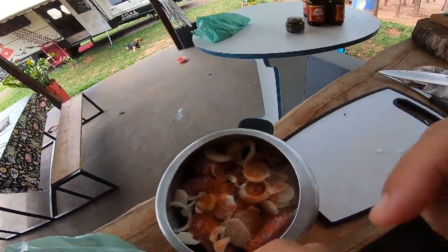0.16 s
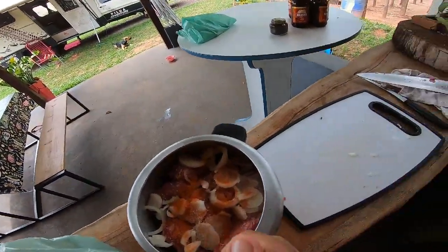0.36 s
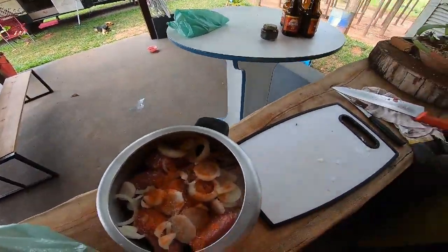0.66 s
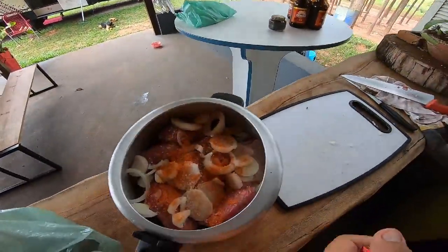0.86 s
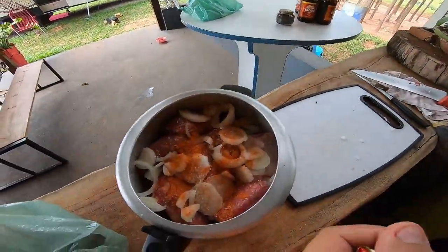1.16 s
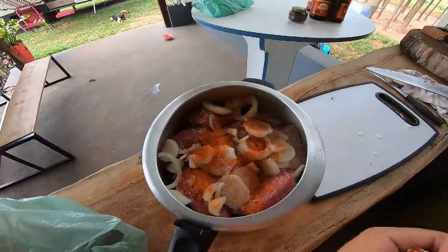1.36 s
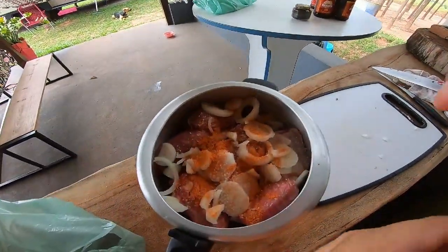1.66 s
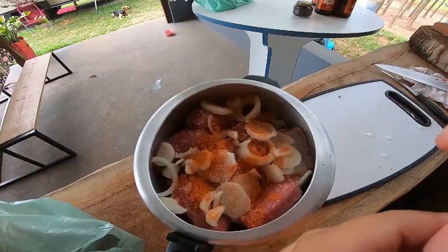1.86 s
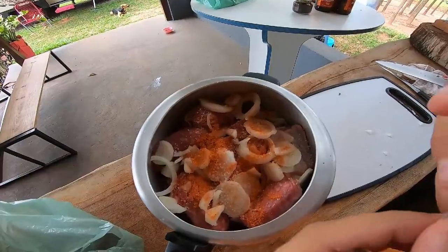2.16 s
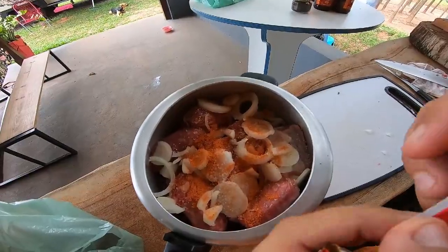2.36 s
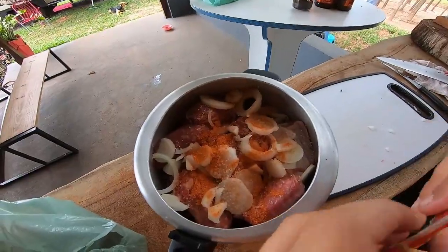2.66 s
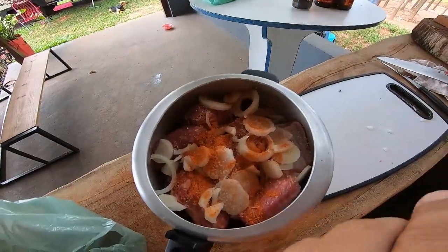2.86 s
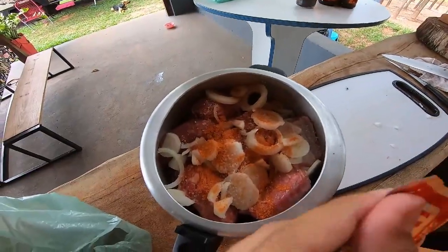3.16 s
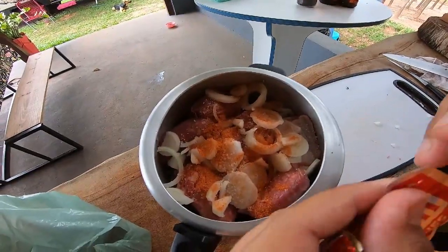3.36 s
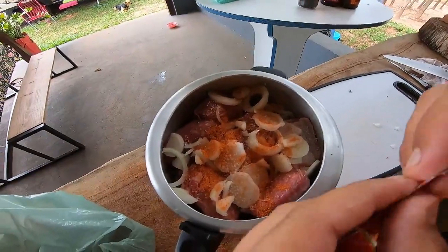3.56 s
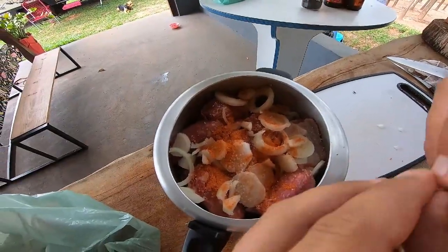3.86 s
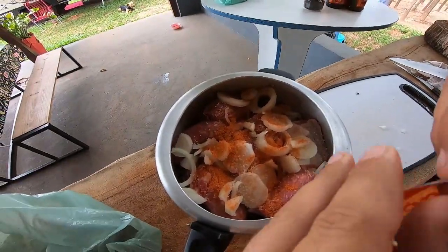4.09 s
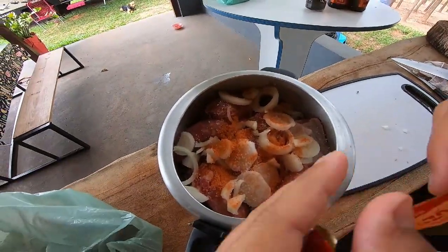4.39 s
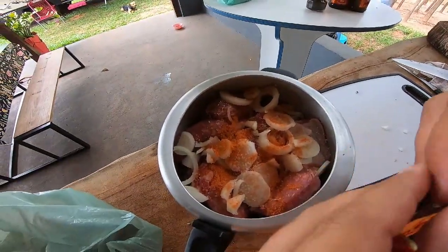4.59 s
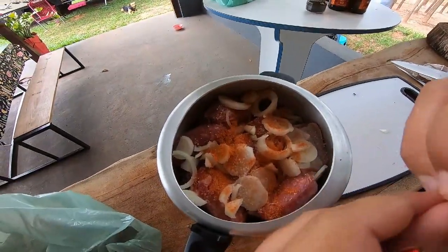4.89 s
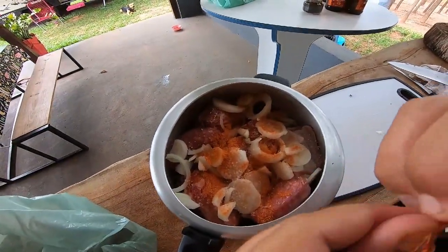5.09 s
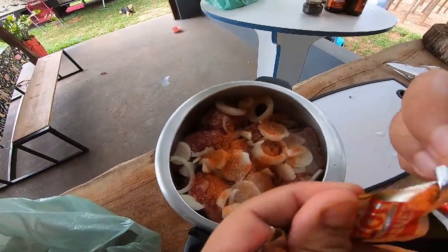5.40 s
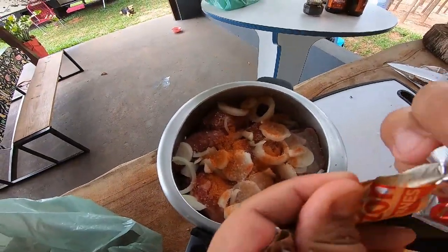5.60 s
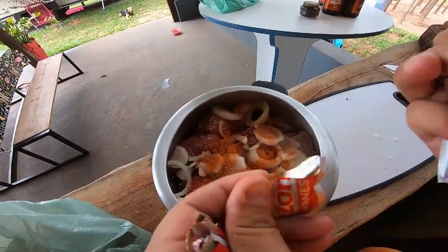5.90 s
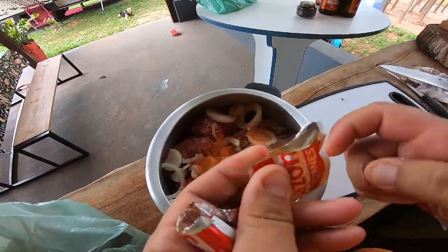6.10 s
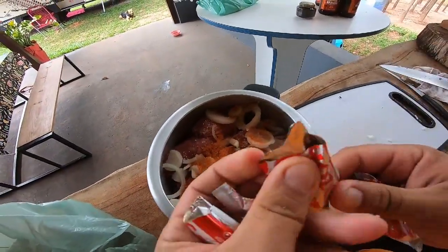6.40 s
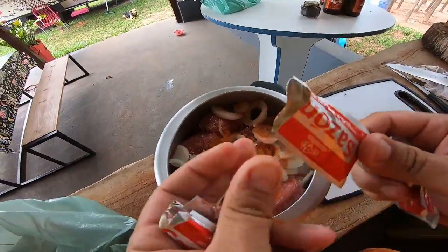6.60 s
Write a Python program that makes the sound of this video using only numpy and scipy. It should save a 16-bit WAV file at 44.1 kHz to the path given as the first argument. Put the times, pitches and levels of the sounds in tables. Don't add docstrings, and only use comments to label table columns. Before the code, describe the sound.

An outdoor patio heard from a body-worn camera. A few light foil ticks come with soft low knocks and skin rubbing on the housing, then lively crinkling takes over, bright, dry and irregular, strongest on the right. Brief lulls separate squeezes, a muted table rumble passes midway, and tearing snaps thicken before loosening into scattered crackles. Little reverberation, steady faint air noise.

```python
import sys
import numpy as np
from scipy import signal
from scipy.fft import rfft, irfft, next_fast_len
from scipy.io import wavfile
from scipy.ndimage import map_coordinates

SR = 44100
rng = np.random.default_rng(int(sys.argv[2]) if len(sys.argv) > 2 else 0)


def wrap_up_sound(samples):
    columns = np.atleast_2d(samples).T
    tamed = np.clip(columns, -1, 1)
    steps = np.round(tamed * 32767).astype(np.int16)
    wavfile.write(sys.argv[1], SR, steps)


def volts_from_db(level):
    exponent = np.asarray(level, float) / 20
    return 10 ** exponent


N = 297542


def rms_one(x):
    return x / np.sqrt(np.mean(x ** 2) + 1e-20)


def in_time(rows, fade_s=0.01):
    s, *columns = np.transpose(rows)
    t = np.arange(N) / SR
    gate = np.clip(np.minimum(t - s[0], s[-1] - t) / fade_s + 1, 0, 1)
    return [np.interp(t, s, c) for c in columns] + [gate]


def at_hz(points, hz):
    f, v = np.transpose(points)
    return np.interp(np.log(hz + 1), np.log(f + 1), v)


def shaped(x, points, phase=((0, 0), (1, 0))):
    size = next_fast_len(N + 4096)
    hz = np.arange(size // 2 + 1) * SR / size
    turn = np.exp(1j * np.interp(hz, *np.transpose(phase)))
    return irfft(rfft(x, size) * volts_from_db(at_hz(points, hz)) * turn, size)[..., :N]


def drift(rate_hz):
    r = np.exp(-2 * np.pi * rate_hz / SR)
    return rms_one(signal.lfilter([1], [1, -2 * r, r * r], rng.standard_normal(N + SR))[SR:])


def ring(clicks, hz, t60):
    r, w = volts_from_db(-60 / (t60 * SR)), 2 * np.pi * hz / SR
    return signal.lfilter([0, np.sin(w)], [1, -2 * r * np.cos(w), r * r], clicks + 1e-18)


def band(x, low_hz, high_hz):
    return signal.sosfilt(signal.butter(2, [low_hz, high_hz], "band", fs=SR, output="sos"), x)


def add(out, sound, s):
    i = round(s * SR)
    out[i:i + len(sound)] += sound[:max(N - i, 0)]


def swell_db(s, crest_db, rise_s, fall_s):
    late = np.arange(N) / SR - s
    return crest_db - 12.5 * np.maximum(-late / max(rise_s, .004), late / max(fall_s, .004))


def hand_work():
    # t/s, peak level/dB, panel pitch f/Hz,
    # edge level over panel/dB
    crease_rows = [(0.0058, -33, 3490, -1), (0.0106, -29, 1440, -9), (0.0644, -26, 3530, -26),
                   (0.1068, -18.5, 4100, -51), (0.113, -19, 4100, -6), (0.1224, -24, 2320, -2),
                   (0.1498, -34, 3080, -29), (0.2226, -29, 2300, -5), (0.2783, -25.5, 2380, 17),
                   (0.3069, -15.5, 3330, -3), (0.3515, -27.5, 2650, -9), (0.3916, -26, 2650, 18),
                   (0.5337, -26.5, 4690, -7), (0.6011, -32, 1860, -6), (0.6644, -32, 1460, -20),
                   (0.7052, -27, 4500, 15), (0.7187, -31.5, 4220, 2), (0.802, -46, 1200, -28),
                   (0.949, -28.5, 3660, -9), (1.108, -47, 1320, -12), (1.2034, -28.5, 1320, -21),
                   (1.2296, -28, 1520, -29), (1.2447, -23, 1380, -17), (1.431, -35.5, 3810, -24),
                   (1.4999, -28, 2920, -7), (1.533, -22.5, 2220, 0.5), (1.596, -14.5, 2670, 4),
             (1.611, -19, 2860, 5), (1.615, -13, 2430, -11), (1.6804, -16.5, 4370, -3),
             (1.686, -14, 3960, -4.5), (1.7033, -23, 2000, 6), (1.7132, -28, 2500, -15),
             (1.757, -25, 2400, -12), (1.7659, -17.0, 3160, -16), (1.7792, -21, 3510, -6),
             (1.7956, -12, 4240, -18), (1.8116, -21.5, 3180, -19), (1.863, -11, 3120, -10),
             (1.873, -22, 3360, -9), (1.8896, -20, 2570, -1), (1.9235, -20.5, 2630, -9),
             (1.962, -19.5, 2370, -3.5), (1.9934, -25.5, 4440, -5), (2.015, -18, 3230, -11),
             (2.075, -15.5, 2900, -8), (2.1105, -20, 2480, -2), (2.126, -18, 2220, -10),
             (2.133, -17.5, 2300, 0), (2.1442, -10.5, 4530, -7), (2.1482, -17, 2270, -7),
             (2.1527, -18, 4310, 7), (2.1593, -19, 3620, -9), (2.1874, -18.5, 2400, -13),
             (2.2135, -18, 2440, -14), (2.228, -26, 2330, -25), (2.2342, -24, 4110, 14),
             (2.2443, -10, 2550, -15.5), (2.2624, -20, 1520, 3), (2.3073, -24.5, 3830, 15),
             (2.3495, -23.5, 3530, 2), (2.3983, -17, 3060, 1),
                   (2.467, -11, 3450, -7.5), (2.509, -24.5, 2400, 20), (2.5235, -32, 2600, -10),
            (2.5401, -19, 2610, -7), (2.545, -18, 3490, 14), (2.551, -29, 2580, 8), (2.5584, -10, 2970, -8),
            (2.5651, -16, 4440, 8), (2.594, -21.5, 2860, -9), (2.612, -22, 4500, -4),
            (2.626, -14.5, 2700, 4), (2.6404, -14.5, 4830, 15), (2.6558, -18, 4650, 16),
            (2.6901, -28, 3570, -12), (2.6973, -22.5, 2990, 15), (2.7139, -19.5, 4670, 25),
            (2.7232, -20, 1620, 5), (2.7492, -23, 1620, 8), (2.7729, -20, 1740, -9),
            (2.787, -21.5, 4300, 4), (2.8084, -21, 3100, -4), (2.819, -19, 4500, -35), (2.84, -22, 4690, 9),
            (2.862, -15, 4300, 0), (2.9078, -23, 1790, 0.5), (2.934, -23, 3620, 8),
            (2.9598, -16, 1960, -3.5), (2.964, -20, 2890, 6), (2.9737, -27, 4590, 12),
            (2.983, -26, 2950, 10), (2.9927, -20.5, 3080, 14), (3.039, -14.5, 3020, -1),
            (3.1326, -17.5, 1490, -12), (3.1342, -16.5, 1600, -2), (3.1393, -11, 1850, -8),
            (3.141, -16, 4000, 14), (3.156, -14.5, 3400, -1), (3.1691, -14, 1480, -15),
            (3.1801, -12.5, 1410, -15), (3.1908, -18, 1800, -15), (3.192, -25, 4900, -8),
            (3.2012, -18.5, 3570, -16),
                   (3.3, -22.5, 1770, -1.5), (3.348, -23.5, 2370, -4.5), (3.3666, -29, 2300, -18),
              (3.389, -25.5, 3600, -18), (3.5063, -29, 2450, -4), (3.5501, -25.5, 4870, -18),
              (3.62, -24, 3260, -44), (3.6363, -25, 3540, -28), (3.669, -20.5, 2560, -19),
              (3.6922, -18.5, 4440, 19), (3.705, -22.5, 3350, -1), (3.7164, -17.5, 3660, 9),
              (3.8584, -24, 3360, 4), (3.8978, -24, 4630, 29), (3.9156, -23.5, 3300, 23),
              (3.9337, -29, 2350, -7), (3.939, -20.5, 3130, -6), (3.9436, -21.5, 3140, -6),
              (3.953, -29, 2280, -12), (3.9861, -21.5, 3270, 8), (4.0292, -21, 1390, -5),
              (4.038, -30, 3120, -7), (4.0728, -20.5, 3250, 0), (4.1706, -22, 3300, -2),
              (4.26, -24.5, 2960, -16), (4.2748, -21, 1550, -2), (4.3354, -23.5, 2290, -1),
              (4.3846, -24, 2550, -8), (4.391, -17.5, 2650, 7), (4.4481, -20, 2760, 6),
              (4.49, -22, 3530, 8), (4.4926, -20.5, 3420, 16), (4.511, -26, 3040, 6),
              (4.546, -23, 3080, 19), (4.556, -23.5, 1500, -6), (4.584, -22.5, 2000, -1),
              (4.602, -25, 4650, 12), (4.6154, -15, 4840, 38), (4.648, -20.5, 1520, -3),
              (4.6565, -21, 1380, -0.5),
                   (4.8419, -21.5, 1270, -2), (4.8502, -16, 1320, 3.5), (4.856, -16, 3370, 30),
            (4.867, -19, 3340, 9), (4.9173, -20.5, 1690, -2), (4.924, -16.5, 3300, -6),
            (4.933, -14.5, 1550, -4), (4.9978, -16.5, 4700, 3), (5.015, -19.5, 3700, -6.5),
            (5.056, -17, 3360, 0), (5.067, -21, 1580, 1), (5.087, -15.5, 1450, -3),
            (5.0941, -14.5, 3360, -5), (5.116, -15, 3270, -9), (5.1351, -13, 4690, 14),
            (5.1503, -15, 1520, -1.5), (5.184, -18.5, 3200, 8), (5.248, -20, 2710, -5),
            (5.268, -13.5, 2230, 0), (5.2809, -11.5, 2140, -3), (5.298, -19, 3380, 6),
            (5.318, -17.5, 3660, -1), (5.3419, -20, 3640, -27), (5.3557, -16.5, 3360, -9),
            (5.4012, -20.5, 3170, -17), (5.411, -15, 3320, -8), (5.4195, -28, 2500, -2),
            (5.441, -20, 2730, -17), (5.45, -20.5, 3490, -2), (5.4723, -22, 2710, -10),
            (5.4766, -19, 3130, -7), (5.4863, -18.5, 3230, -8),
                   (5.509, -23, 3080, -21), (5.5195, -27, 2800, -14), (5.53, -16.5, 3160, -12),
                 (5.5388, -24, 2110, -15), (5.5514, -15, 2440, 1), (5.6033, -19, 3760, -8),
                 (5.6347, -12, 2700, -17), (5.6407, -23, 3550, -7), (5.6491, -11, 2500, -10),
                 (5.6733, -23, 3290, 20), (5.7052, -17, 3290, -2.5), (5.7535, -25.5, 2620, 2),
                 (5.7699, -25, 3270, 0), (5.8556, -19, 2760, -22), (5.8847, -11.5, 2950, -19),
                 (5.8915, -11.5, 3000, -23), (5.897, -31, 2000, -1), (5.9313, -29.5, 3120, -21),
                 (5.9634, -23.5, 3650, 11), (6.023, -32, 2500, -13), (6.0887, -26, 3920, -11),
                 (6.095, -30, 2580, 0), (6.1188, -14, 3200, -30), (6.1284, -24, 2720, -4),
                 (6.1344, -22, 2400, -15), (6.1825, -26.5, 2900, -11), (6.2158, -30, 2800, 6),
                 (6.2287, -28, 2570, -8), (6.2424, -26, 3520, 3), (6.255, -23, 3220, 11),
                 (6.2616, -19, 3210, 3), (6.2681, -14, 3520, 5), (6.3453, -15.5, 3440, -8),
                 (6.357, -15.5, 3460, -19), (6.3667, -21, 3330, -12), (6.415, -15.5, 1460, -3.5),
                 (6.4443, -25, 3830, -15), (6.5646, -22, 2040, -17), (6.5901, -15, 3440, -29),
                 (6.6179, -17, 2920, -8), (6.6627, -23, 2830, -5), (6.6837, -21, 4000, 2),
                   (3.0853, -26.5, 1910, -7.5), (3.1162, -27.5, 4200, -1), (3.1807, -15.5, 4420, -15),
             (3.4702, -28, 3080, -22), (4.7929, -21, 1560, 7), (4.8762, -19, 4400, 10),
             (5.7852, -30, 3770, -22), (5.8302, -23.5, 2940, -11), (5.8441, -32, 2590, -16),
             (5.935, -31, 4030, 2), (6.553, -29, 3160, -26)]
    return crease_rows


def spit(jerks):
    return .05 * ring(jerks, 9800, .0025) + volts_from_db(-13) * ring(jerks, 14000, .0015)


def snaps(rows):
    out, chance = np.zeros(N), rng.random((len(rows), 17))
    for (s, peak_db, hz, edge_db), c in zip(rows, chance):
        jerks = np.zeros(700)
        when = np.cumsum(1 + c[:5] ** 1.5 * .0012 * SR).astype(int)
        jerk_db = np.array([-20, -11, 0, -3, -7]) - 6 * c[5:10]
        jerks[when] = volts_from_db(jerk_db) * np.sign(c[10:15] - .5)
        overtone_hz = min(hz * (1.4 + .8 * c[16]), 5200)
        overtone = volts_from_db(-6 + .68 * min(edge_db, 0)) * ring(jerks, overtone_hz, 7 / overtone_hz)
        panel = ring(jerks, hz, 6 / hz) + overtone
        fray = spit(jerks) + np.flip(spit(np.flip(jerks)))
        edge = ring(jerks, 5300 + 1700 * c[15], .002) + fray
        sound = panel / abs(panel).max() + volts_from_db(edge_db + 6) * edge / abs(edge).max()
        start_s = max(s - when[2] / SR - .0002, 0)
        add(out, volts_from_db(peak_db + 4) * sound / abs(sound).max(), start_s)
    return band(band(out, 1000, 11800), 1000, 11800)


def knead():
    # t/s, crackle level/dB
    grip = [(0.25, -55.5), (0.45, -65), (1.5, -62), (2.45, -56), (2.7, -49), (3.5, -58), (3.6, -70),
            (3.68, -52.5), (4.66, -59), (4.74, -67), (4.84, -53), (5.9, -60.5), (6.2, -50.5), (6.75, -62)]
    # crest t/s, crackle level/dB, build-up/s
    squeezes = [(0.001, -47.5, 0.043), (0.111, -45, 0.074), (1.61, -43.5, 0.033), (1.785, -43, 0.057),
                (1.876, -42.5, 0.096), (2.151, -44, 0.022), (2.239, -39.5, 0.012), (2.368, -47, 0.042),
                (2.557, -43, 0.04), (2.641, -41.5, 0.16), (2.806, -41.5, 0.08), (2.97, -36.5, 0.037),
                (3.049, -43, 0.035), (3.143, -40.5, 0.031), (3.187, -36, 0.032), (3.47, -53.5, 0.12),
                (3.637, -31, 0.0051), (3.931, -44.5, 0.11), (4.234, -44, 0.036), (4.391, -49, 0.59),
                (4.453, -40.5, 0.03), (4.504, -41, 0.029), (4.613, -50, 0.28), (4.927, -35.5, 0.019),
                (5.476, -32.5, 0.031), (5.515, -39, 0.26), (5.893, -28, 0.0073), (6.131, -43, 0.04),
                (6.362, -39, 0.077), (6.675, -47.5, 0.32)]
    level_db = in_time(grip)[0]
    for s, crest_db, rise_s in squeezes:
        level_db = np.maximum(level_db, swell_db(s, crest_db, rise_s, min(rise_s, .046)))
    return level_db


def crackle(level_db, bright_db, panel_hz):
    # f/Hz, level per Hz/dB
    foil_colour = [(290, -41), (500, -32), (1080, -77), (1300, 16), (2360, 13.5), (3390, 18), (3920, 8.5),
                   (6420, 19.5), (10100, -4.5), (16000, -45)]
    sizes = volts_from_db(3.3 * np.minimum(rng.exponential(1, N), 4)) * rng.choice([-1, 1], N)
    born = rng.random(N) < 3500 * volts_from_db(3.2 * drift(50)) / SR
    pitches, dealt = np.geomspace(600, 14000, 30), rng.integers(0, 30, N)
    split_hz, focus_db_per_octave = 4500, 7.0
    octaves_off = abs(np.log2(np.minimum(pitches[dealt], split_hz) / panel_hz))
    sizes = sizes * volts_from_db(-focus_db_per_octave * octaves_off * (pitches[dealt] < split_hz))
    dull, bright = 0, 0
    for k, hz in enumerate(pitches):
        grains = rms_one(ring(sizes * born * (dealt == k), hz, 11 / hz))
        grains = grains * np.sqrt(hz) * volts_from_db(at_hz(foil_colour, hz))
        if hz < split_hz:
            dull = dull + grains
        else:
            bright = bright + grains
    mix = rms_one(dull) + volts_from_db(bright_db) * rms_one(bright)
    return volts_from_db(level_db + 3.5) * band(mix, 734, 12100)


def pops():
    # t/s, peak level/dB, f/Hz, t60/s
    folds = [(2.955, -37.5, 680, 0.025), (2.968, -40.5, 493, 0.024), (1.243, -38, 900, 0.026),
             (3.152, -35.5, 300, 0.01), (3.176, -25.5, 202, 0.0048), (3.2, -29.5, 219, 0.0048),
             (5.523, -38, 340, 0.023), (5.651, -27.5, 420, 0.011), (5.894, -33.5, 154, 0.027),
             (6.415, -36, 805, 0.0037)]
    out, click = np.zeros(N), np.pad(np.hanning(40) / 20, (0, 4000))
    for s, peak_db, hz, t60 in folds:
        add(out, volts_from_db(peak_db + 10) * ring(click, hz, t60), s)
    return band(band(out, 120, 3000), 120, 3000)


def at_ports(foil, pan_db):
    # f/Hz, level/dB
    shadow = [(200, -25), (700, -13.5), (2400, -18.5), (4400, -26), (8100, -13), (15000, -7)]
    # f/Hz, phase/radians
    port_phase = [(340, -.3), (1030, 1.9), (1640, 2.0), (2330, 1.3), (4050, .5), (5000, -2.0), (8270, -3.3),
                  (15700, -9.9)]
    far = map_coordinates(foil, [np.arange(N) + .75 * drift(5.7)], order=3)
    return np.array([shaped(far, shadow, port_phase) * volts_from_db(pan_db + 6), foil]) * volts_from_db(4)


def patio(x, t60, count):
    t, out = np.arange(int(t60 * SR)) / SR, 0
    pose = np.repeat(rng.integers(0, count, N // 400 + 1), 400)[:N]
    for k in range(count):
        tail = rng.standard_normal((2, len(t))) * volts_from_db(-60 * t / t60) * (t > .0003)
        tail = tail / np.sqrt(np.sum(tail[0] ** 2))
        out = out + signal.oaconvolve((x * (pose == k))[None], tail, axes=1)[:, :N]
    return out


def bumps(rows):
    out, t = np.zeros(N), np.arange(SR // 2) / SR
    for s, peak_db, hz, t60, push_s in rows:
        push_s = min(push_s, .05)
        rise = np.sin(np.pi / 2 * np.clip(t / push_s, 0, 1)) ** 2
        swell = rise * volts_from_db(-60 * np.maximum(t - push_s, 0) / t60)
        add(out, -volts_from_db(peak_db + 16.5) * swell * np.sin(2 * np.pi * hz * t), s)
    return out


def arm_bumps():
    # t/s, peak level/dB, f/Hz, t60/s, push length/s
    knocks = [(.506, -23, 60.7, 0.13, 0.05), (.53, -30.5, 204, 0.043, 0.015),
              (.6655, -26, 156.6, 0.11, 0.002), (.908, -26, 73.6, 0.042, 0.0075),
              (.915, -33.5, 166, 0.12, 0.0023), (1.176, -33, 154, 0.045, 0.007),
              (1.2, -34.5, 154, 0.073, 0.0031), (1.243, -33.5, 159, 0.057, 0.0041),
              (1.245, -36, 61, 0.11, 0.008), (1.329, -30, 146, 0.07, 0.0045),
              (1.334, -37, 63.5, 0.1, 0.0068)]
    thuds = bumps(knocks)
    return np.array([-volts_from_db(-18.5) * thuds, thuds])


def press():
    # t/s, rumble level/dB, knocking level/dB
    pressure = [
        (0.35, -60, -65.5),
        (0.694, -45.5, -53),
        (1.02, -59.5, -63.5),
        (1.192, -65, -62),
        (1.42, -73, -67),
    ]
    white = rng.standard_normal((2, 2, N))
    rumble, knock = rms_one(band(white[0], 19, 43)), rms_one(band(white[1], 107, 173))
    rumble_db, knock_db, gate = in_time(pressure)
    return gate * (volts_from_db(rumble_db + 7.5) * rumble + volts_from_db(knock_db + 8) * knock) * volts_from_db(6.1 * drift(45))


def drag():
    # crest t/s, level/dB, build-up/s, shell tone f/Hz, tone level/dB
    strokes = [
        (0.535, -36, 0.013, 1330, -8),
        (0.667, -44.5, 0.053, 1345, 0),
        (0.928, -38.5, 0.09, 1273, -0.5),
        (1.283, -46, 0.096, 1610, 0),
    ]
    # f/Hz, width/Hz, level/dB
    shell_modes = [(380, 77, -1), (950, 1300, -8.5), (4240, 21000, -5.5)]
    slips = rng.standard_normal((2, N)) * (rng.random(N) < 2500 / SR)
    slips = band(slips, 200, 6000)
    shell = sum(volts_from_db(db) * rms_one(ring(slips, hz, 0.84 / width)) for hz, width, db in shell_modes)
    out = 0
    for s, crest_db, rise_s, hz, tone_db in strokes:
        tone = rms_one(ring(ring(slips, hz, .012), hz, .012))
        out = out + volts_from_db(swell_db(s, crest_db, rise_s, .022)) * (volts_from_db(tone_db) * tone + shell)
    return band(out, 120, 6300)


def gap():
    # start t/s, end t/s, from f/Hz, to f/Hz, level/dB, bend
    slides = [
        (.62, .88, 4400, 2600, -56, .9),
        (.97, 1.25, 5200, 3350, -55.5, .6),
    ]
    low_pass = signal.butter(2, 340, fs=SR, output="sos")
    slow = signal.sosfilt(low_pass, rng.standard_normal((2, 2, N)))
    slow = rms_one(slow[0]) + 1j * rms_one(slow[1])
    out, t = 0, np.arange(N) / SR
    for start, end, from_hz, to_hz, level_db, bend in slides:
        hz = from_hz * (to_hz / from_hz) ** np.clip((t - start) / (end - start), 0, 1) ** bend
        gate = np.clip(np.minimum(t - start, end - t) / .05 + 0.83, 0, 1)
        carrier = np.exp(2j * np.pi * np.cumsum(hz) / SR)
        out = out + gate * volts_from_db(level_db) * np.real(slow * carrier)
    return out


def table():
    # t/s, level/dB
    grumble = [
        (3.977, -39.5),
        (3.995, -39),
        (4.045, -52),
        (4.07, -40),
        (4.14, -53),
        (4.25, -77),
    ]
    # t/s, peak level/dB, f/Hz, t60/s, push length/s
    leans = [
        (4.085, -50.5, 100, 0.051, 0.021),
        (4.08, -49.5, 36, 0.28, 0.021),
        (0.0013, -59.5, 71, 0.088, 0.0044),
        (2.77, -72, 70, 0.13, 0.038),
        (6.07, -69.5, 72, 0.068, 0.011),
    ]
    level_db, gate = in_time(grumble, fade_s=0.0018)
    wood = band(band(rng.standard_normal(N), 110, 345), 60, 360)
    return gate * volts_from_db(level_db) * rms_one(wood) + bumps(leans)


def bird():
    # t/s, level/dB
    peeps = [
        (.41, -54),
        (.425, -55),
        (.455, -58),
        (.49, -57),
    ]
    out, t = np.zeros(N), np.arange(1300) / SR
    for s, db in peeps:
        swell = (t / 0.0052) * np.exp(1 - t / 0.0061)
        add(out, volts_from_db(db) * swell * np.sin(2 * np.pi * 3650 * t), s - .006)
    return out


def air():
    # f/Hz, level per Hz/dB
    air_colour = [(18, -67), (30, 2), (87, -14), (147, 7), (205, 10), (581, -4), (1140, -3.5), (1340, -5),
                  (3880, -9.5), (7240, -6.5), (10200, -28), (15000, -60)]
    # f/Hz, likeness
    likeness = [(60, 0.71), (300, 0.9), (640, 0.13), (1400, -1.1), (3100, 0.84), (7000, 0.11)]
    mid, side = rng.standard_normal((2, N))
    mid_share = [(hz, 10 * np.log10(1.38 + np.clip(c, -1, 1))) for hz, c in likeness]
    side_share = [(hz, 10 * np.log10(1.38 - np.clip(c, -1, 1))) for hz, c in likeness]
    mid, side = shaped(mid, mid_share), shaped(side, side_share)
    hum = rms_one(shaped(mid + side * [[1], [-1]], air_colour))
    hum = volts_from_db(-55.5 + 0.94 * drift(7)) * hum
    return hum + band(hum, 20, 110) * (volts_from_db(3 * drift(4)) - 1)


def scene():
    # t/s, brightness/dB, left-right level/dB
    hands = [
        (0, -0.5, 0),
        (3.8, -1, 3),
        (5.9, 1.5, 2.5),
        (6.2, 2.5, 1),
        (6.75, -3.5, 7),
    ]
    bright_db, pan_db, _ = in_time(hands)
    rows = hand_work()
    _, panel_hz, edge_db, _ = in_time(sorted(rows))
    creases = snaps([(s + .001, *rest) for s, *rest in rows])
    bed = crackle(knead(), bright_db + .088 * edge_db, panel_hz)
    foil = creases + bed + pops()
    scatter = volts_from_db(-7) * patio(foil, .01, count=10) + volts_from_db(-19) * patio(foil, .1, count=2)
    pressing = press() * volts_from_db(np.array([[-5], [4]]))
    rubbing = drag() * volts_from_db(np.array([[1.5], [3]]))
    housing = arm_bumps() + pressing + rubbing
    background = table() + gap() + bird() + air() * volts_from_db(np.array([[-.7], [1.3]]))
    return at_ports(foil, pan_db) + scatter + housing + background


def band_limit(x):
    return signal.sosfilt(signal.butter(12, 16790, fs=SR, output="sos"), x)


def record(dry):
    # f/Hz, level/dB
    closing_tone = [(9500, -1), (12500, -7.5), (15950, -3.5), (16600, -30)]
    heard = shaped(dry, closing_tone)
    return band_limit(heard)


dry = scene()
out = record(dry)
wrap_up_sound(out)
```